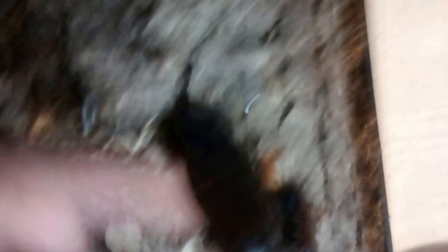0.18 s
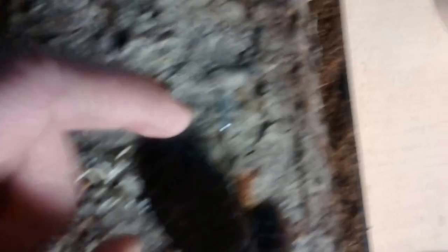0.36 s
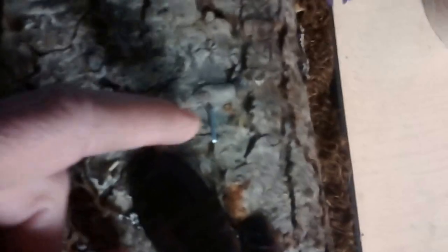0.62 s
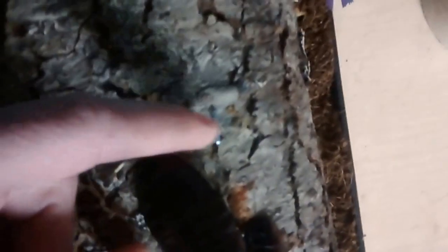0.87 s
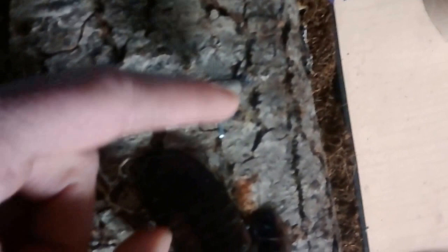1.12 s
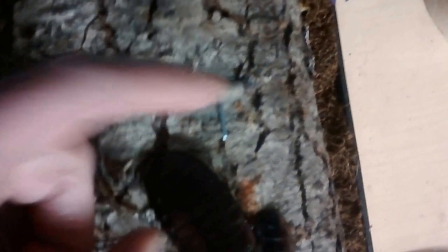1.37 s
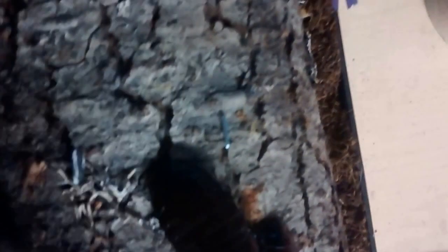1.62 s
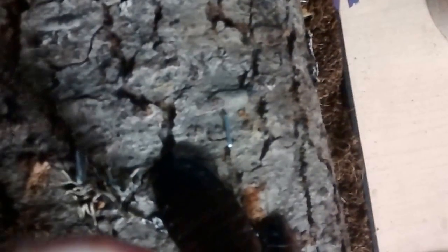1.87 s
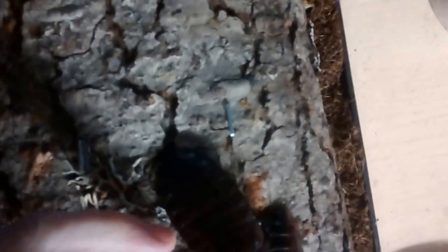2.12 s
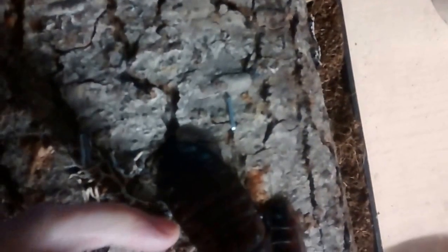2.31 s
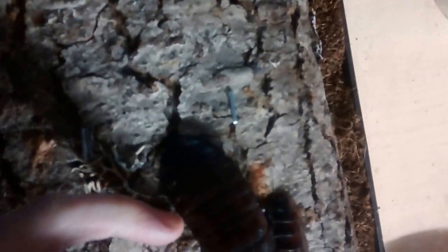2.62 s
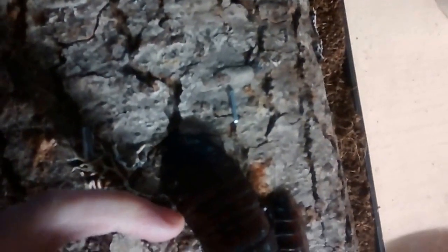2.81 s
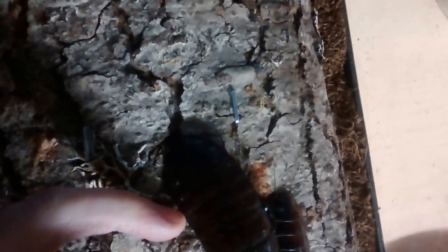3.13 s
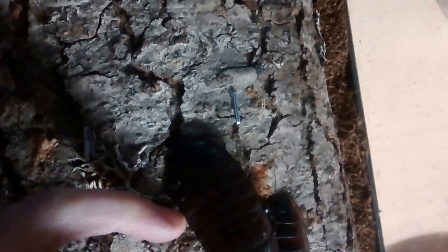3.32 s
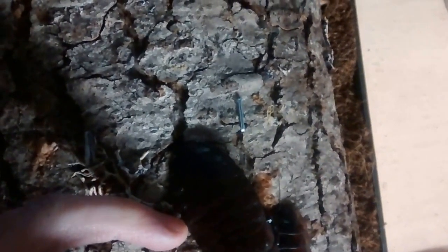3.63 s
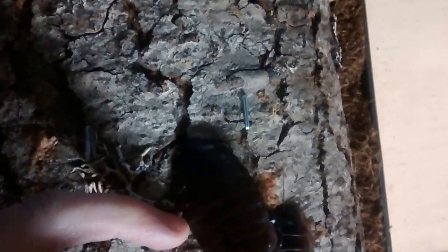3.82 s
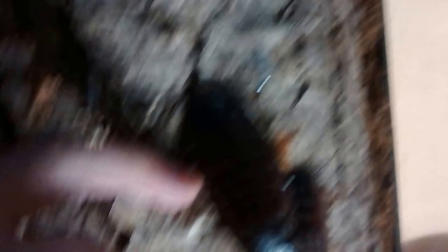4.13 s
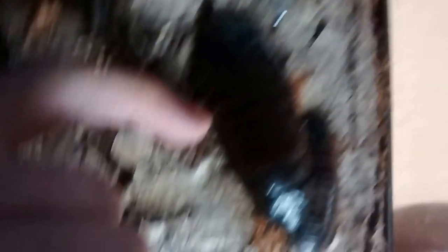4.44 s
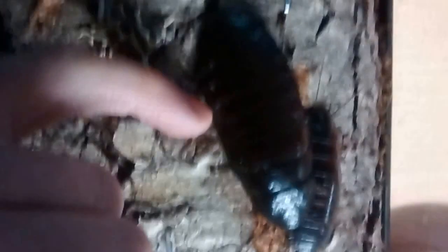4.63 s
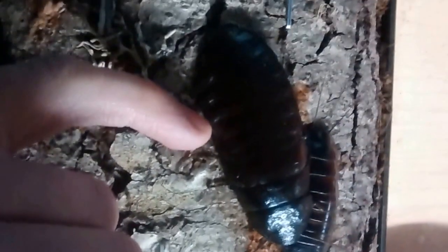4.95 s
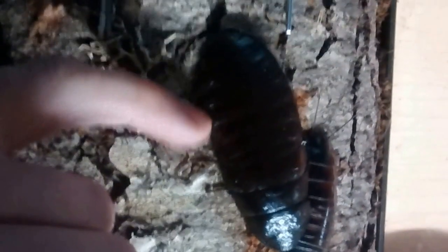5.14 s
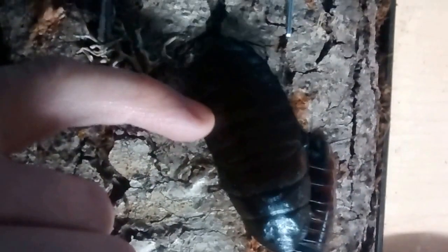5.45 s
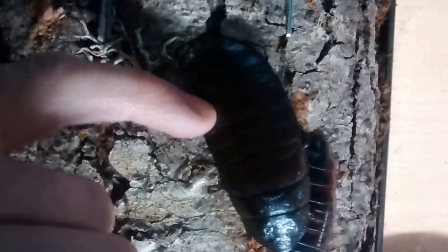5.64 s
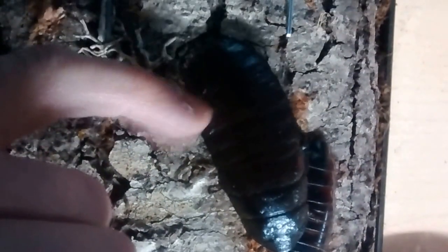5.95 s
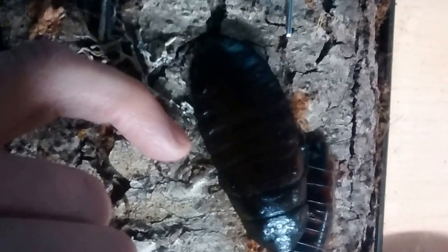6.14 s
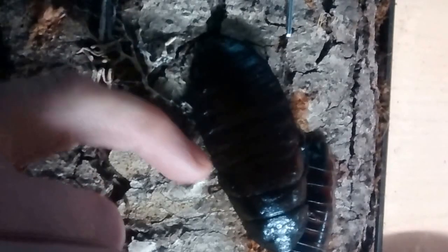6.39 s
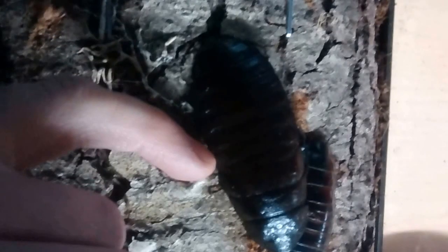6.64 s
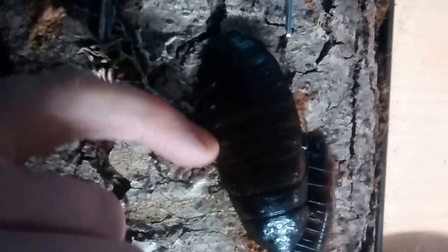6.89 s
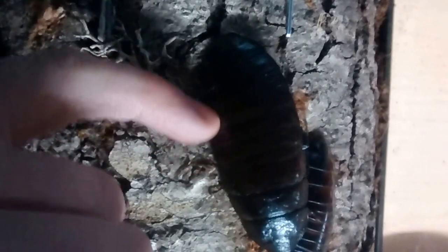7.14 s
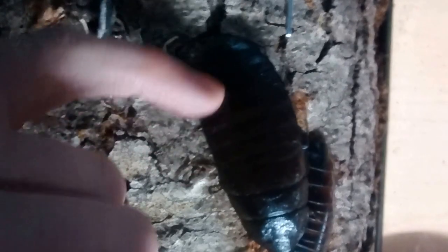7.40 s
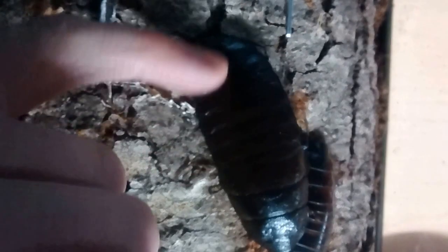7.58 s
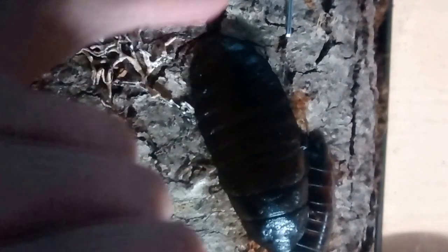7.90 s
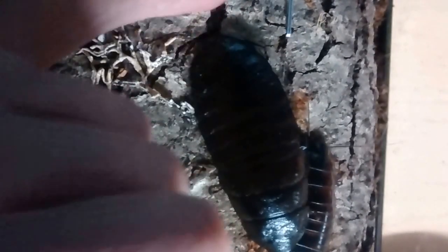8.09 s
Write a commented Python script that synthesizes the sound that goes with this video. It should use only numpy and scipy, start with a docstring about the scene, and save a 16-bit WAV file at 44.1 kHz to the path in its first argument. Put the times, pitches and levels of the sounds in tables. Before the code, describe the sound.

Four sharp airy hisses from a prodded insect, each about six tenths of a second, close up in a quiet room with dull bumps.

```python
"""Hissing cockroach in a glass tank

A large cockroach hisses four times when prodded: noise stands for the turbulent air forced through its
spiracles, gated by the flow, coloured by airway resonances and scattered by bark, hand and glass.
The room adds rumbling and rushing noise and a faint fuzzy tone; beneath lies a low hum of sine partials.
Thumps and ticks are decaying tones and noise. Subtracting delayed crosstalk widens the camera's two ports.
"""
import sys
import numpy as np
from scipy import signal
from scipy.fft import rfft, irfft, next_fast_len
from scipy.io import wavfile
from scipy.ndimage import map_coordinates

SR = 44100
rng = np.random.default_rng(int(sys.argv[2]) if len(sys.argv) > 2 else 0)


def unload_wav(signal):
    """Save mono or channel-first audio to the path in sys.argv[1] as 16-bit WAV at rate SR, clipped to [-1, 1]."""
    wavfile.write(
        sys.argv[1],
        SR,
        np.round(np.clip(np.atleast_2d(signal).T, -1, 1) * 32767).astype(np.int16),
    )


N = 364266


def amp(db):
    """Decibel law: amplitude ratio of a level."""
    return 10 ** (np.asarray(db) / 20)


def unit(x):
    """Normalisation to an rms of 1 over all ports together."""
    return x / np.sqrt(np.mean(x ** 2) + 1e-20)


def along(points, hz):
    """Linear interpolation of (frequency, value) points on a logarithmic frequency axis."""
    f, v = np.transpose(points)
    return np.interp(np.log(hz + 1), np.log(f + 1), v)


def level_curve(points):
    """Linear interpolation of (time, level) points, one value per sample."""
    s, db = np.transpose(points)
    return np.interp(np.arange(N) / SR, s, db)


def wobble(rate, count=N):
    """Slow random modulation: a smooth spline through random knots, rate knots a second."""
    knots = rng.standard_normal(int(count * rate / SR) + 4)
    return map_coordinates(knots, [np.arange(count) * rate / SR])


def filtered(x, response):
    """Linear filtering: the spectrum times a real or complex response of frequency."""
    m = next_fast_len(x.shape[-1] + 8192)
    spectrum = rfft(x, m) * response(np.fft.rfftfreq(m, 1 / SR))
    return irfft(spectrum, m)[..., :x.shape[-1]]


def diffuse_noise(spectrum):
    """Partial coherence: mid and side noises mixed to a set correlation of the ports, rms 1."""
    # correlation of the two ports: (frequency [Hz], correlation [-1..1])
    alike = [(40, 0.015), (120, 0), (400, 0.15), (1500, 0), (4000, 0)]

    def mid_side(hz):
        turn = np.arccos(np.clip(along(alike, hz), -1, 1)) / 2
        return amp(along(spectrum, hz)) * [np.cos(turn), np.sin(turn)]

    mid, side = filtered(rng.standard_normal((2, N)), mid_side)
    return unit(np.array([mid + side, mid - side]))


def room():
    """Broadband and narrowband noise: a gently moving rumble, a steady rush and a fuzzy tone."""
    # spectral shape of each noise: (frequency [Hz], relative level per Hz [dB])
    rumble_shape = [(20, 2.5), (60, -0.5), (90, -1.5), (150, 1), (225, -8.5), (320, -1), (480, -6.5),
                    (900, -15), (2000, -17), (5000, -47)]
    rush_shape = [(500, 6), (1500, -9), (3000, 8.5), (5000, 7), (9000, 3.5), (15500, 3)]
    # course of the rumble before its fixed lift: (time [s], level [dB])
    rumble_course = [(0.05, -61), (1.94, -61), (2.17, -64), (3.18, -61), (5.17, -62.5), (5.68, -60),
                     (6.52, -63.5), (8.26, -60)]
    # the fuzzy tone: (centre [Hz], width [Hz], rms level [dB])
    centre, width, whine_db = (1244, 38, -75.5)
    rumble_lift_db, rush_db = 6.5, -59.5
    whine = filtered(rng.standard_normal(N), lambda hz: 1 / (1 + (2 * (hz - centre) / width) ** 2))
    rumble_db = level_curve(rumble_course) + rumble_lift_db + 1.44 * wobble(6)
    rumble = amp(rumble_db) * diffuse_noise(rumble_shape)
    return rumble + amp(rush_db) * diffuse_noise(rush_shape) + amp(whine_db) * unit(whine)


def hum():
    """Harmonic series: modulated sine partials, earlier and louder on the left."""
    # wavering high harmonics: (multiple of the fundamental, middle rms level [dB])
    high_harmonics = [(4, -73.5), (6, -76.5)]
    # course of the third harmonic before its wobble: (time [s], rms level [dB])
    third_course = [(0.2, -62), (1.77, -68), (1.82, -53), (1.91, -79), (2.0, -61.5), (2.33, -58.5),
                    (2.62, -72), (2.78, -62), (3.63, -60), (3.95, -65), (4.15, -55.5), (4.24, -65.5),
                    (5.43, -57.5), (6.33, -50), (7.04, -59), (7.56, -58), (7.61, -52), (8.26, -64.5)]
    hum_hz, hum_db = 42.66, -55.5
    port_shift = np.array([[.0004], [-.0004]])  # s
    turn = 2 * np.pi * hum_hz * (np.arange(N) / SR + port_shift)
    first = amp(hum_db + 1.2 * wobble(4)) * np.sin(turn + .25 * wobble(6))
    third_db = level_curve(third_course) + 1.34 * wobble(8.9)
    third = amp(third_db) * np.sin(3 * turn + .2 * wobble(2.2))
    high = sum(amp(db + 6.4 * wobble(2.022)) * np.sin(k * turn) for k, db in high_harmonics)
    # the root turns rms levels into sine peaks
    return np.sqrt(2) * (first + third + high) * amp([[.8], [-.8]])


def flow(t, start, length, swell, fade):
    """Valve-gated flow: shares of full flow while opening (with one catch) and while closing."""
    # brief interruption of flow: (time [s], half width to 1/e [s], share lost)
    catch_s, catch_width, lost = (1.011, 0.0075, 0.97)
    open_s, burst = 0.0041, 0.12  # the spiracles pop open to this share, then the flow swells
    sag_db, sag_s = 2, 0.042  # the pressure sags before they close
    left = length - t
    rise = (1 - np.exp(-(t / open_s) ** 2)) * (1 - (1 - burst) * np.exp(-t / swell))
    fall = (1 - np.exp(-(left / fade) ** 2.5)) * amp(-sag_db * np.exp(-left / sag_s))
    catch = 1 - lost * np.exp(-((start + t - catch_s) / catch_width) ** 2)
    return rise * catch + 1e-3, fall + 1e-3  # the floor keeps the logarithms finite


def jet_noise(count):
    """Turbulence with partial coherence: a shared stream with a phase lead, plus separate ones."""
    # phase lead of the left port: (frequency [Hz], lead [turns])
    left_lead = [(1300, 0), (1950, .5), (3000, .5), (3600, 1), (4300, 1.2), (5000, 1.28), (5600, 1.2),
                 (6300, 1.9), (7500, 2.4), (9000, 3.1), (12000, 3.9), (15000, 5.1)]
    # power that each port hears alone: (frequency [Hz], share)
    alone_share = [(1500, .25), (2000, 0.0067), (2800, 0.015), (3300, 0.14), (9000, 0.18), (15000, 0.31)]

    def alone(hz):
        return np.clip(along(alone_share, hz), 0, 1)

    def shared_response(hz):
        lead = np.exp(1j * np.pi * np.outer([1, -1], along(left_lead, hz)))
        return np.sqrt(1 - alone(hz)) * lead

    shared = filtered(rng.standard_normal(count), shared_response)
    separate = filtered(rng.standard_normal((2, count)), lambda hz: np.sqrt(alone(hz)))
    return shared + separate


def tank(x, wet_db, t60):
    """Early reverberation: direct sound plus quick bright scatter, independent at each port."""
    t = np.arange(SR // 20) / SR
    scatter = np.diff(rng.standard_normal((2, len(t) + 1)))  # differencing tilts it to the treble
    scatter *= amp(-60 * t / t60)
    scatter *= amp(wet_db) / np.linalg.norm(scatter, axis=1, keepdims=True)
    scatter[:, 0] += 1  # direct sound
    return signal.fftconvolve(x, scatter, axes=1)


def airways(hz, pose):
    """Resonance and cancellation: a broad jet spectrum with the narrow peaks and dips of a pose."""
    # jet through the breathing tubes at each port: (frequency [Hz], relative level per Hz [dB])
    jet_left = [(1030, -94.5), (1400, -97), (2200, -75), (2900, -67.5), (3790, -77.5), (5000, -66.5),
                (6030, -73.5), (7000, -62), (8300, -61.5), (9820, -66), (11300, -76.5), (13000, -83.5),
                (14300, -77.5), (15400, -88)]
    jet_right = [(1030, -94), (1300, -75.5), (1720, -84.5), (2250, -81), (2900, -84.5), (3790, -69),
                 (5000, -58.5), (5700, -63.5), (6400, -70.5), (8500, -65), (10160, -73.5), (12000, -77),
                 (14000, -84.5), (15400, -77)]
    db = np.array([along(jet_left, hz), along(jet_right, hz)])
    db -= 24 * np.log2(np.maximum(1030 / (hz + 1), 1))  # 24 dB per octave below 1030 Hz
    for centre, width, *lift_db in pose:
        db += np.outer(lift_db, 1 / (1 + (2 * (hz - centre) / width) ** 2))
    return amp(db)


def cockroach():
    """Aeroacoustic source and filter: fluttering turbulence, shaped by airways and flow."""
    # hisses: (start [s], length [s], nominal level [dB], swell time constant [s], fade scale [s],
    # base body lift [dB], base treble lift [dB], treble rise [dB/s], left-right difference [dB],
    # level growth [dB/s])
    hisses = [(0.981, .63, -30.5, 0.036, 0.048, 1.3, -1.5, 2, 2.3, 2),
              (2.632, .598, -29, 0.048, 0.044, -1, 1, -8, 1.5, 1.5),
              (5.294, .596, -28, 0.15, 0.033, 1.5, 4, -14, 1, 1),
              (7.14, 0.68, -31, 0.057, 0.063, -0.26, 1, -6, 0.8, 4.5)]
    # resonances of tubes, bark, hand and glass, one list for each hiss:
    # (centre [Hz], width [Hz], lift left [dB], lift right [dB])
    poses = [
        [(1800, 150, 0, 13.5), (2650, 100, -12, -3), (3970, 110, 12, 3.5), (4430, 220, 4, -11),
         (4995, 560, 2.5, 3.5), (6130, 180, 3, 3), (7070, 240, 5, 3), (7550, 150, -17, 15),
         (8200, 240, 5.5, -15), (8530, 230, 5, 12.5), (9970, 200, 1.5, 11), (10200, 190, -1, -2),
         (12400, 200, 4, -3), (13700, 220, 0, 5)],
        [(1803, 150, 3, 16.5), (2420, 98, -4, 8), (3860, 50, 9, 10.5), (4320, 140, 14, -4), (5120, 170, 4, 4),
         (6140, 160, 15, 7), (7140, 150, 3, -3), (7370, 200, -8, 10), (8160, 300, 8, -4), (8570, 260, -3, 10),
         (9950, 230, 6, -1), (10300, 220, 2, 2), (11800, 220, 0, -6), (14800, 170, 4, 4)],
        [(1802, 184, 8, 19.5), (3760, 400, 9.5, 9), (4820, 540, 2, 6), (5540, 450, 12, 8), (6850, 240, 8, -9),
         (7830, 220, 9, 10), (8200, 240, -10, 5), (8860, 270, 9, 3), (9340, 240, -6, 8), (9600, 220, 6, 4),
         (10250, 220, 8, -3), (10850, 220, 6, 6), (11650, 680, 9.5, 10), (14990, 190, 10, 2)],
        [(1802, 205, 11.5, 20), (2550, 420, 4.5, 5), (3595, 130, 19.5, -13), (3910, 190, -15, 12.5),
         (4910, 470, 7, 8), (5640, 460, 16, 6), (6910, 220, 8, -2), (7740, 240, 5, 12.5), (8300, 220, -8, 5),
         (8690, 290, 11, 6), (9150, 200, 4.5, -1), (10300, 200, 4, -2), (10500, 200, 0, 8), (11500, 220, 11, 6)],
    ]
    # band without a centre, for each hiss: (low [Hz], high [Hz], centre share left in the strand)
    hollow_bands = [(1880, 2906, 0.028), (1890, 2900, 0.027), (1880, 3220, 0.47), (1930, 3250, 0.94)]
    # narrow strand within that band: (low [Hz], high [Hz])
    strand_low, strand_high = (2573, 2750)
    dull_per_db, dull_max_db = 0.56, 13  # weak flow lifts the body
    dim_per_db, keep_per_db = 0.8, 0.4415  # treble is dim in the swell, holds up in the fade
    out = np.zeros((2, N + SR))
    for hiss, pose, (low_hz, high_hz, strand) in zip(hisses, poses, hollow_bands):
        s, length, db, swell, fade, body_db, treble_db, rise_db, pan_db, grow_db = hiss
        start, count = round(s * SR), int(length * SR)
        t = np.arange(count) / SR
        from_middle = t - length / 2
        rise, fall = flow(t, s, length, swell, fade)
        share = rise * fall
        weak_db = -20 * np.log10(share)
        body_db = body_db + np.minimum(dull_per_db * weak_db, dull_max_db)
        treble_db = treble_db + rise_db * from_middle
        treble_db += 20 * (dim_per_db * np.log10(rise) - keep_per_db * np.log10(fall))

        flutter = amp(0.23 * wobble(41.7, count=count) + 0.11 * wobble(300, count=count))
        jet = tank(flutter * jet_noise(count), wet_db=-2.0, t60=0.033)
        jet = unit(filtered(jet, lambda hz: airways(hz, pose)))[:, :count]
        body = filtered(jet, lambda hz: 1 / (1 + (hz / 6200) ** 8))
        treble = filtered(jet, lambda hz: 1 / (1 + (10000 / (hz + 1)) ** 8))
        jet = jet + (amp(body_db) - 1) * body + (amp(treble_db) - 1) * treble
        pan = np.array([[.5], [-.5]]) * pan_db
        unsteady_db = .5 * wobble(6.9, count=count)
        jet = jet * share * amp(db + grow_db * from_middle + unsteady_db + pan)

        def hollow(hz):
            in_strand = (hz > strand_low) * (hz < strand_high)
            return (hz > low_hz) * (hz < high_hz) * (1 - strand * in_strand)

        # the hollow band keeps the left-right difference and the strand's share of the centre
        centre = filtered(jet.mean(axis=0), hollow)
        out[:, start:start + count] += jet - centre
    return out[:, :N]


def bumps():
    """Damped oscillation and decaying noise: thumps and hollow knocks with a dull puff, dry ticks."""
    # thumps and knocks: (time [s], level before the soft attack [dB], frequency [Hz], t60 [s])
    thumps = [(3.498, -30.5, 26, 0.25), (3.589, -35, 22, 0.25), (3.649, -37, 35, 0.17),
              (3.715, -55, 166, .2), (4.05, -46, 166, 0.17), (4.064, -23.5, 33, 0.11),
              (4.12, -27.5, 27.8, 0.11), (4.166, -32.5, 35.8, 0.2), (4.483, -35, 157, 0.16),
              (4.623, -27, 36, 0.27), (4.627, -49, 162, 0.13), (4.741, -33, 35.3, 0.14),
              (5.14, -36, 28, 0.24), (5.201, -30, 31.8, 0.12), (5.62, -25.5, 37.3, 0.17),
              (5.67, -28, 34.5, 0.1), (6.104, -32, 35, 0.14)]
    # ticks: (time [s], noise level before filtering [dB], t60 [s])
    ticks = [(4.2242, -39, 0.05), (5.252, -52, .012)]
    out = np.zeros((2, N + SR))
    t = np.arange(SR // 2) / SR
    for s, db, hz, t60 in thumps:
        puff = unit(filtered(rng.standard_normal(len(t)), lambda f: f / (1 + (f / 180) ** 3)))
        envelope = amp(db - 60 * t / t60) * (1 - np.exp(-t / 0.017))
        thump = envelope * (amp(-19.5) * puff - np.sin(2 * np.pi * hz * t))
        start = round(s * SR)
        out[:, start:start + len(t)] += np.outer(amp([1.5, -1.5]), thump)
    for s, db, t60 in ticks:
        decay = rng.standard_normal((2, len(t))) * amp(db - 60 * t / t60)
        start = round(s * SR)
        tick = filtered(decay, lambda hz: hz / 1500 / (1 + (hz / 3800) ** 6))
        out[:, start:start + len(t)] += tick
    return out[:, :N]


def scene():
    """Superposition of the cockroach, the room noise, the hum and the bumps."""
    return cockroach() + room() + hum() + bumps()


def record(dry):
    """Stereo widening by delayed crosstalk subtraction, then a sharp band limit."""
    # opposite port subtracted from each side: (frequency [Hz], share)
    cross_share = [(200, 0.19), (1200, 0.5), (2500, 0.54), (4000, 0.11), (6000, 0.18), (15000, 0.16)]
    # further factor on that share for the right side: (frequency [Hz], factor)
    right_factor = [(3000, 0.91), (4200, 4.2), (6000, 0.17), (15000, .1)]
    delay_s, top_hz = 0.0004, 15500

    def cross(hz):
        delayed = np.exp(-2j * np.pi * hz * delay_s) * along(cross_share, hz)
        return delayed * [np.ones_like(hz), along(right_factor, hz)]

    wide = dry - filtered(dry[::-1], cross)
    return filtered(wide, lambda hz: hz < top_hz)


dry = scene()
out = record(dry)
unload_wav(out)
```